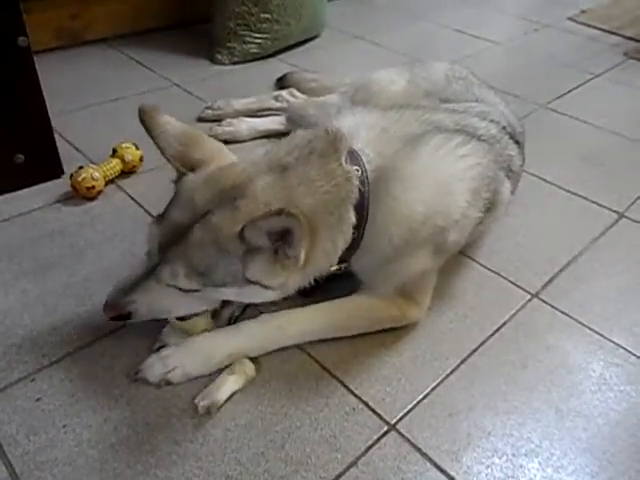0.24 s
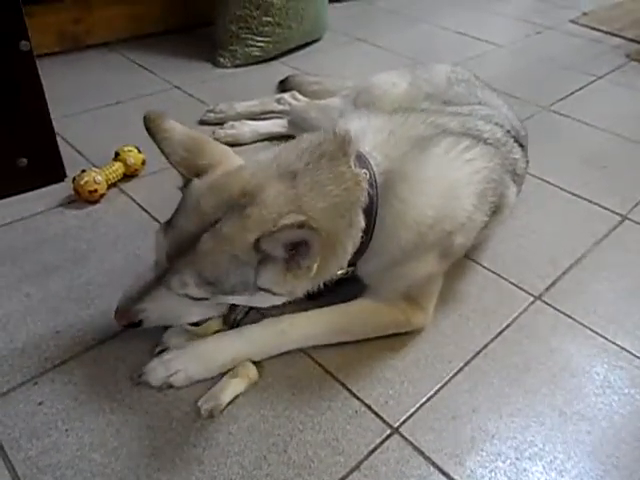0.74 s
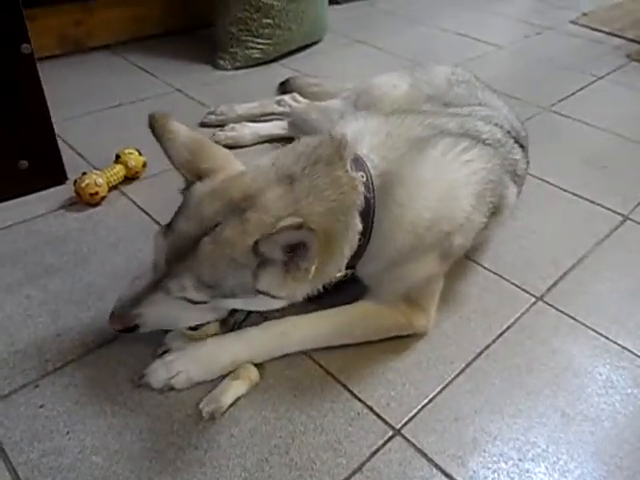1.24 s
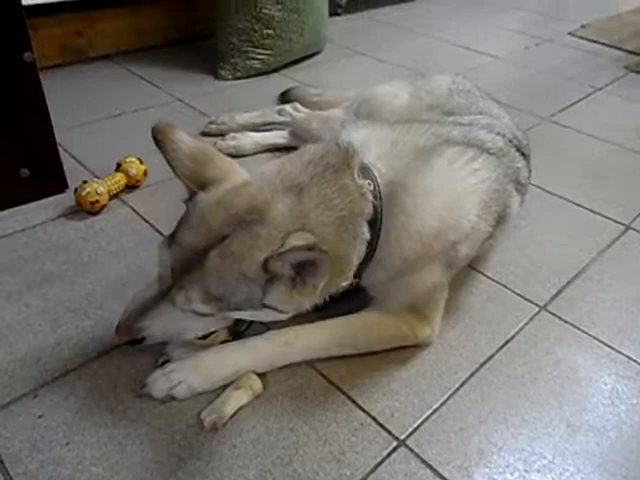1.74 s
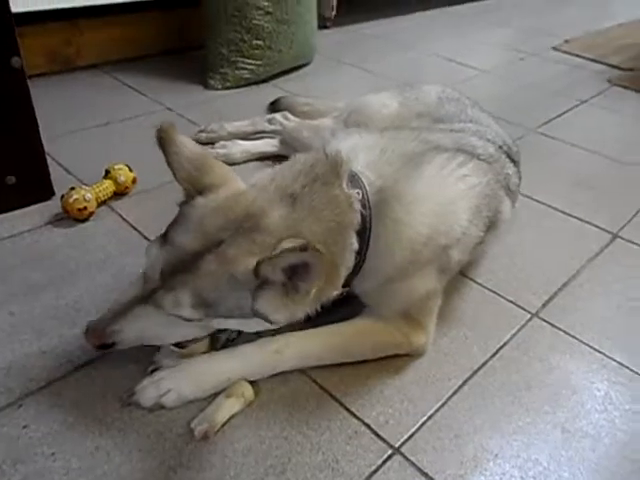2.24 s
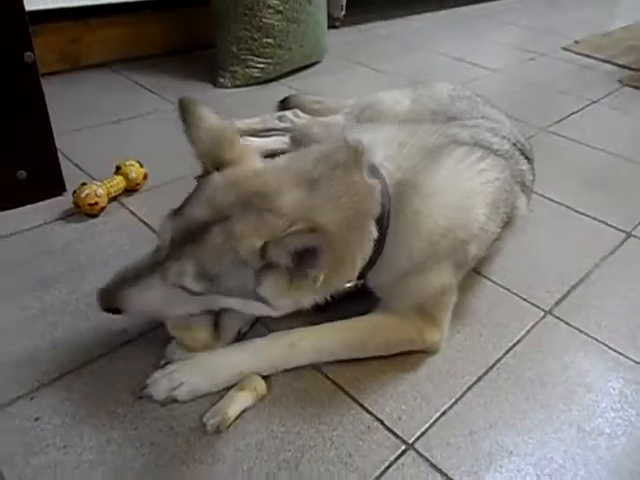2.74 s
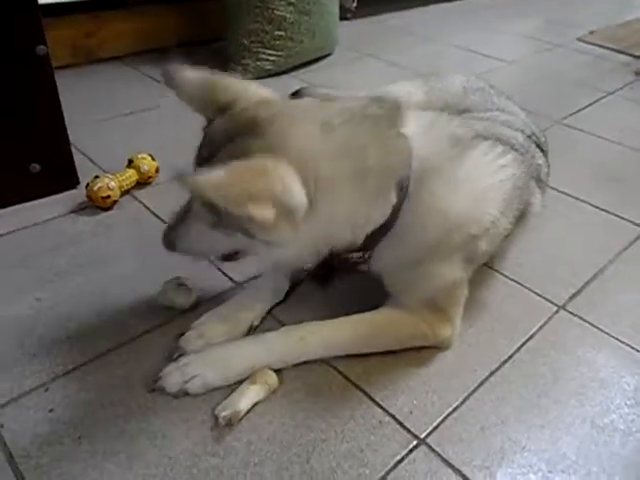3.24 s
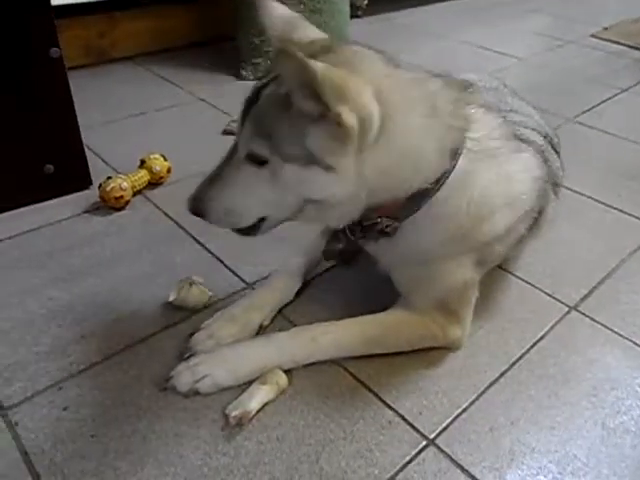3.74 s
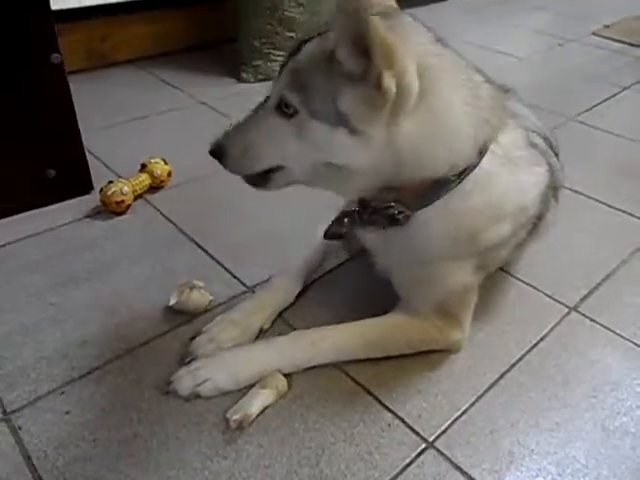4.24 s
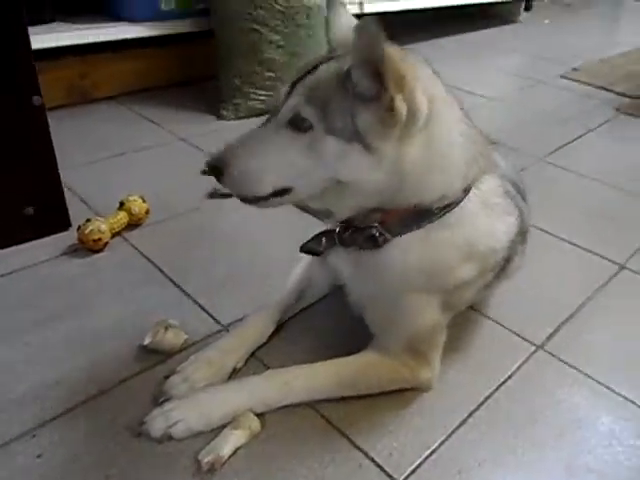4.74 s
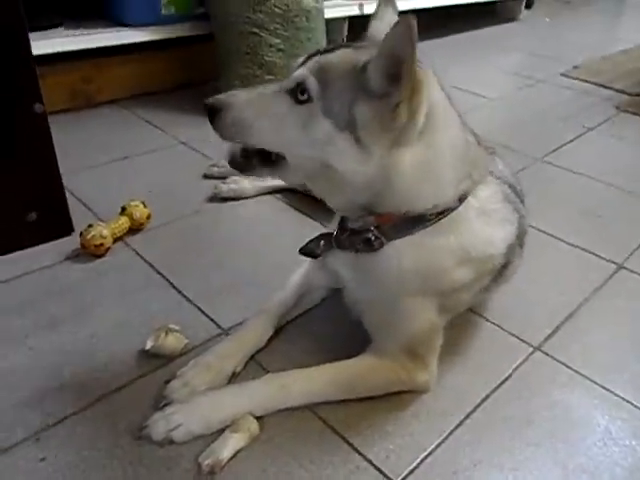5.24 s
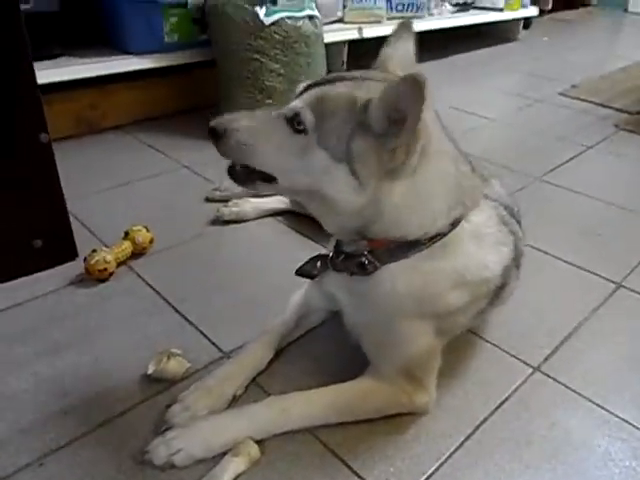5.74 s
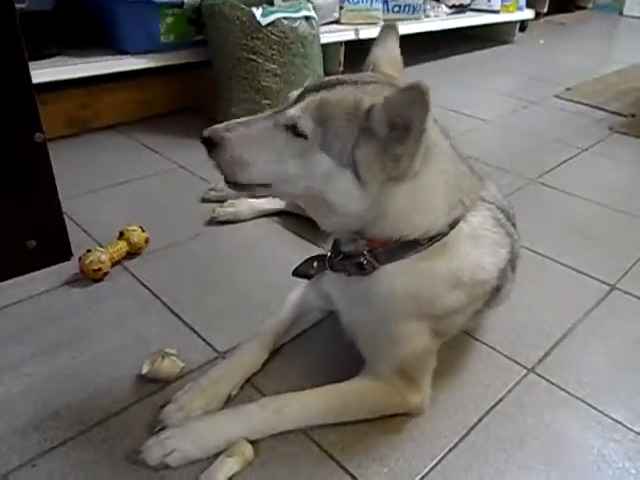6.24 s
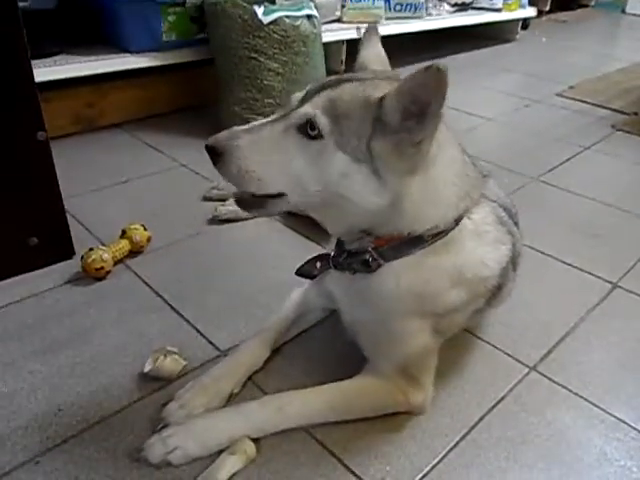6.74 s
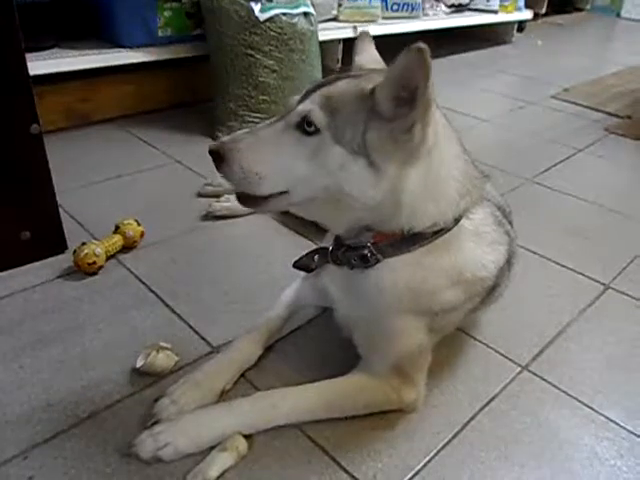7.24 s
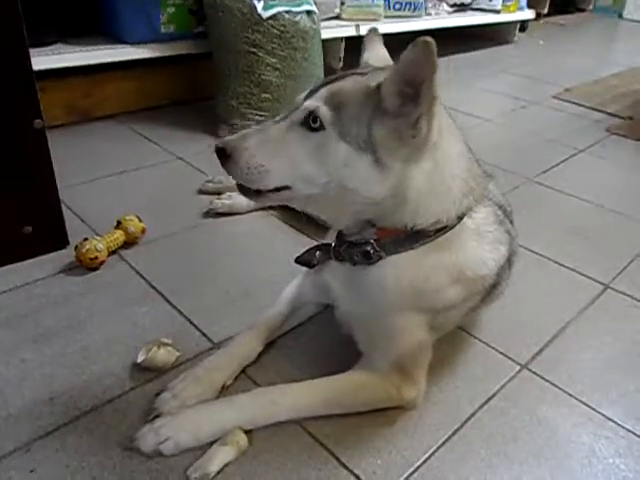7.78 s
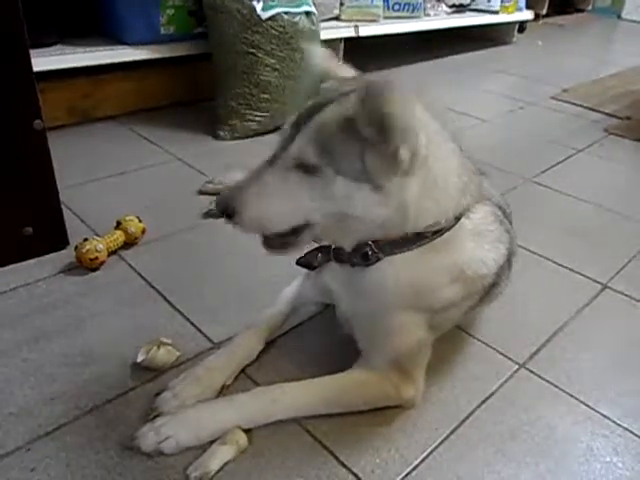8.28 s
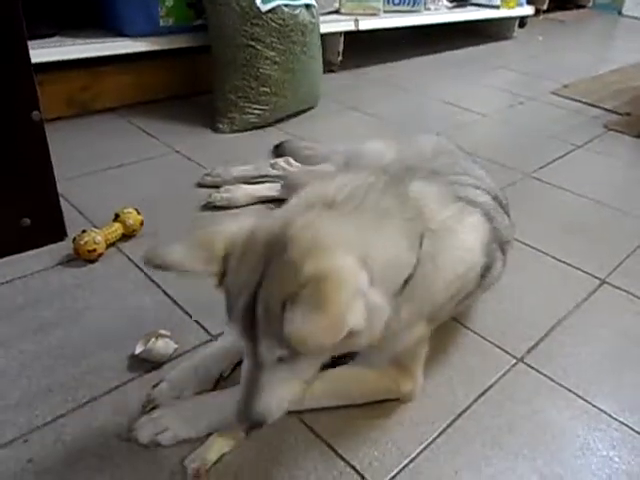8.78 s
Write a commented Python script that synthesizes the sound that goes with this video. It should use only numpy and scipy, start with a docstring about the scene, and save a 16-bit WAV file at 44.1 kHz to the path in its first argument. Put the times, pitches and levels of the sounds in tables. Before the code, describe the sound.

A small parakeet whistles and chatters hoarsely throughout in a tiled room, while a dog crunches a hard chew near the microphone. Brittle snaps with small thuds fill the first third, then give way to soft scraping and tooth ticks. A few brief, harsh squawks or snorts cut in toward the end. Quiet room hiss, a low hum and handling rumble sit behind it all.

```python
"""A room with a tiled floor, heard through the microphone of a hand-held camera.
Close up, a dog gnaws a hard chew: its teeth rub and tick, and each crack knocks through jaw and floor.
Across the room a small parakeet warbles, short whistles amid scratchy chatter. A few harsh, raspy
bursts cut in, bird squawks or dog snorts. Underneath lie room hiss, an appliance's hum and the
camera's handling rumble."""
import sys
import numpy as np
from scipy import signal
from scipy.fft import rfft, irfft, next_fast_len
from scipy.io import wavfile
from scipy.ndimage import map_coordinates

SR = 44100
rng = np.random.default_rng(int(sys.argv[2]) if len(sys.argv) > 2 else 0)


def unload_audio(sound):
    """Save the sound as a 16-bit wav file, at the path given as the first command line argument."""
    columns = np.transpose(np.atleast_2d(sound))
    # keep every value between -1 and 1, then stretch to whole-number steps
    steps = np.round(np.clip(columns, -1, 1) * 32767)
    wavfile.write(sys.argv[1], SR, steps.astype(np.int16))


N = 397341

# the parakeet's phrases: (time [s], length [s], centre pitch [Hz], voice level [dB], rasp level [dB])
PHRASES = [(0.0, 0.26, 1900, -61, -61), (0.358, 0.053, 1500, -56.5, -73), (0.595, 0.15, 2300, -57.5, -74),
           (0.999, 0.28, 2480, -61, -84), (1.394, 0.15, 2550, -56.5, -75),
           (1.901, 0.27, 2060, -58.5, -63.5), (2.26, 0.2, 2580, -52.5, -75), (2.578, 0.28, 2260, -62, -71),
           (2.851, 0.65, 2470, -58, -71.5), (3.649, 0.2, 2260, -58, -66.5),
           (3.944, 0.22, 2330, -59.5, -68.5), (4.229, 0.23, 2290, -55, -68.5),
           (4.472, 0.21, 1840, -60, -63), (4.703, 0.15, 2540, -52, -68.5), (4.997, 0.25, 2450, -56, -56.5),
           (5.318, 0.17, 2140, -57.5, -59), (5.512, 0.22, 2850, -55, -60), (5.951, 0.35, 2380, -61, -62),
           (6.377, 0.32, 2130, -62.5, -59), (6.706, 0.21, 2410, -54, -58.5),
           (6.997, 0.35, 2650, -55, -69.5), (7.353, 0.18, 2450, -55, -71), (7.764, 0.15, 2590, -55.5, -67),
           (7.954, 0.45, 2390, -59, -64.5), (8.56, 0.19, 2790, -50, -66), (8.852, 0.11, 2900, -52, -52.5)]
# how hard the teeth work: (time [s], level [dB])
GNAW_EFFORT = [(0.0, -85), (0.25, -64.5), (0.95, -61), (1.3, -61), (3.26, -62), (4.59, -62), (5.71, -62),
               (5.84, -61.5), (7.09, -60), (7.39, -65), (8.2, -63), (9.0, -66)]


def amp(db):
    return np.exp(np.asarray(db) * (np.log(10) / 20))


def unit(x):
    return x / np.sqrt(np.mean(x ** 2) + 1e-20)


def along(points, hz):
    """Read (frequency, value) points at hz, on a log axis."""
    f, v = np.transpose(points)
    return np.interp(np.log(hz + 1), np.log(f + 1), v)


def level_at(points, t):
    """Read (time, level) points at times t."""
    return np.interp(t, *np.transpose(points))


def wobble(rate):
    """A smooth random curve, rate knots a second."""
    knots = rng.standard_normal(int(N * rate / SR) + 4)
    smooth = map_coordinates(knots, [np.arange(0, N + 8, 8) * rate / SR])
    return np.interp(np.arange(N) / 8, np.arange(len(smooth)), smooth)


def filtered(x, response):
    """Shape x by a frequency response."""
    size = next_fast_len(N + SR // 2)
    return irfft(rfft(x, size) * response(np.fft.rfftfreq(size, 1 / SR)), size)[..., :N]


def noise(response):
    """Coloured noise of rms 1."""
    return unit(filtered(rng.standard_normal(N), response))


def resonance(f, centre, width):
    return 1j * f * width / (centre ** 2 - f * f + 1j * f * width)


def add(track, s, x):
    """Mix x into track from time s."""
    part = track[round(s * SR):][:len(x)]
    part += x[:len(part)]


def background():
    """Drifting room hiss, an appliance's wavering hum and the rumble of the hand-held camera."""
    # room tone: (frequency [Hz], relative density [dB])
    air = [(41, -29), (70, -0.5), (108, -8.5), (190, -10.5), (421, -13.5), (516, -18.5), (813, -10.5),
           (953, -16.5), (2210, -17), (3900, -25), (7880, -23.5), (15900, -34.5)]
    # appliance hum: (frequency [Hz], level [dB], wander [Hz])
    hum_lines = [(100.1, -55, 2.01), (121.9, -65.5, 4), (150, -67.5, 1.99), (436, -72.5, 4),
                 (1118, -70.5, 4), (1369, -71.5, 4)]
    # handling rumble: (time [s], level [dB])
    handling = [(0, -61.5), (2.6, -61.5), (3.3, -54.5), (4.7, -55), (6.5, -59.5), (8.5, -60), (8.75, -43.5),
                (9, -51)]
    hiss = amp(-58 + 0.71 * wobble(6)) * noise(lambda f: amp(along(air, f)) * (f > 60))
    hum = sum(amp(db + 0.5 * wobble(30)) * np.sin(2 * np.pi * np.cumsum(hz + wander * wobble(15)) / SR)
              for hz, db, wander in hum_lines)
    rumble = noise(lambda f: (f / 20) ** 2 / (1 + (f / 20) ** 2) / (1 + (f / 52) ** 6))
    return hiss + hum + amp(level_at(handling, np.arange(N) / SR)) * rumble


def room(x):
    """Tiled walls answer; each frequency dies at its own speed."""
    # reverberation: (frequency [Hz], t60 [s])
    decay = [(300, 0.1), (3000, 0.19), (10000, 0.21)]
    hz, t, spectrum = signal.stft(rng.standard_normal(SR // 2), SR, nperseg=256)
    tail = signal.istft(spectrum * amp(-60 * t / along(decay, hz)[:, None]), SR, nperseg=256)[1]
    return signal.fftconvolve(np.pad(x, (200, 0)), tail / np.linalg.norm(tail))[:N]


def bird_voice(hz):
    """A whistle with two overtones; the windpipe lifts the upper one near 8 kHz."""
    phase = 2 * np.pi * np.cumsum(hz) / SR
    windpipe = 1 / (1 + ((3 * hz - 8300) / 900) ** 2)
    return np.sin(phase) + amp(-19.5) * np.sin(2 * phase) + amp(-6.5) * windpipe * np.sin(3 * phase)


def whistles(clear_db=-70, hoarse_per_db=0.0956):
    """The parakeet's abrupt, gliding notes; the raspier the phrase, the more pitch and level shake."""
    # whistled notes: (time [s], length [s], first pitch [Hz], last pitch [Hz], level [dB])
    notes = [(0.104, 0.06, 1284, 1613, -51), (1.008, 0.028, 2640, 2740, -52.5),
             (1.044, 0.025, 2154, 2520, -44.5), (1.121, 0.039, 2900, 3085, -53),
             (1.188, 0.058, 2150, 2100, -54.5), (1.19, 0.062, 1045, 1047, -54),
             (1.536, 0.037, 2600, 2554, -48), (2.264, 0.022, 1980, 1920, -51.5),
             (2.353, 0.028, 2274, 2320, -47), (2.425, 0.037, 2520, 2540, -46.5),
             (2.581, 0.038, 1990, 2780, -48), (2.629, 0.024, 1530, 1525, -47.5),
             (2.655, 0.037, 2400, 2410, -47.5), (2.718, 0.09, 2700, 1252, -54),
             (2.804, 0.028, 2440, 2533, -49.5), (2.851, 0.035, 4050, 3300, -49),
             (2.897, 0.074, 3110, 2710, -51), (2.959, 0.025, 2180, 2290, -52),
             (3.089, 0.033, 2770, 2763, -52), (3.223, 0.03, 2855, 2807, -52.5),
             (3.293, 0.037, 2378, 2370, -46.5), (3.356, 0.038, 2834, 2730, -52.5),
             (3.44, 0.053, 1440, 1570, -52), (3.546, 0.034, 1480, 1520, -48),
             (3.664, 0.043, 2730, 2935, -50), (3.698, 0.015, 3310, 3300, -45),
             (3.738, 0.032, 2635, 2614, -50), (4.032, 0.053, 3300, 2470, -54.5),
             (4.299, 0.068, 2260, 2360, -49), (4.374, 0.04, 2520, 2530, -45),
             (4.586, 0.025, 1342, 1530, -51.5), (4.714, 0.037, 2320, 2760, -52),
             (4.772, 0.03, 2750, 2800, -48), (4.798, 0.0296, 2790, 2900, -43.5),
             (5.062, 0.027, 2650, 2704, -44), (5.567, 0.035, 3910, 3825, -47.5),
             (5.596, 0.071, 2417, 2340, -47.5), (5.627, 0.067, 2796, 2726, -46),
             (5.652, 0.016, 3800, 3955, -40), (6.09, 0.046, 2870, 2767, -50.5),
             (6.16, 0.018, 2310, 2180, -47), (6.214, 0.038, 2523, 2460, -48),
             (6.423, 0.046, 2010, 2120, -52), (6.487, 0.041, 2560, 2530, -52.5),
             (6.56, 0.07, 1900, 1237, -52), (6.721, 0.029, 3014, 3020, -51.5),
             (6.994, 0.047, 2350, 2886, -53), (7.108, 0.06, 2982, 2727, -48.5),
             (7.391, 0.055, 2790, 2810, -51.5), (7.44, 0.051, 2667, 2520, -46.5),
             (7.54, 0.054, 3310, 3010, -48), (7.782, 0.054, 3200, 2876, -47.5),
             (7.851, 0.037, 2780, 2606, -47), (8.176, 0.064, 2627, 2210, -48),
             (8.246, 0.049, 2663, 2496, -44.5), (8.305, 0.05, 2060, 1858, -50),
             (8.554, 0.037, 2370, 2590, -49), (8.618, 0.032, 2760, 2755, -48.5),
             (8.654, 0.026, 3200, 3340, -42), (8.724, 0.018, 4240, 4326, -43),
             (8.679, 0.021, 1503, 1530, -45.5), (8.854, 0.021, 2027, 1870, -48),
             (8.855, 0.04, 3950, 3900, -53.5), (8.888, 0.025, 2650, 2530, -48),
             (8.884, 0.078, 2050, 1408, -50.5), (8.965, 0.045, 2098, 2060, -56.5)]
    out = np.zeros(N)
    waver, flutter = np.tile([wobble(400), wobble(300)], 2)
    starts, *_, rasp_db = np.transpose(PHRASES)
    for s, length, first_hz, last_hz, db in notes:
        t = np.arange(round(length * SR)) / SR
        here = slice(round(s * SR), round(s * SR) + len(t))
        nearest = np.abs(starts - s).argmin()
        hoarse = 1 + hoarse_per_db * max(rasp_db[nearest] - clear_db, 0)
        hz = (first_hz + (last_hz - first_hz) * t / length) * (1 + 0.0156 * hoarse * waver[here])
        shape = np.clip(t / 0.0017, 0, 1) * np.clip((length - t) / 0.0041, 0, 1)
        shake_db = 2.8 * hoarse * flutter[here].clip(-3, 1)
        add(out, s, amp(db + shake_db) * shape * bird_voice(hz))
    return out


def chatter(phrase_sag=0.15):
    """The parakeet hops between short, hoarse notes round each phrase's sinking pitch, over a rasp."""
    voice_level, rasp_level, centre_hz = np.zeros((3, N))
    for s, length, hz, db, rasp_db in PHRASES:
        t = np.arange(round(length * SR)) / SR
        shape = np.clip(t / 0.017, .25, 1) * np.clip((length - t) / 0.025, 0, 1)
        add(voice_level, s, amp(db) * shape)
        add(rasp_level, s, amp(rasp_db) * np.clip(np.minimum(t / .003, (length - t) / 0.048), 0, 1))
        add(centre_hz, s, hz * (1 + phrase_sag * (.5 - t / length)))
    throat = lambda f: ((f / 900) ** 2 / (1 + (f / 900) ** 2) / (1 + (f / 3600) ** 6)
                        + 0.2 / (1 + ((f - 8200) / 1000) ** 2))
    roughness = amp(2 * wobble(40) + 4.5 * wobble(250) + .5)
    out = rasp_level * roughness * noise(throat)
    for strand in range(3):
        count = np.cumsum(45 * np.exp(.4 * wobble(20))) / SR  # about 45 notes a second
        note, progress = count.astype(int), count % 1
        jump, accent = rng.standard_normal((2, N // 100))[:, note].clip(-2, 1.2)
        hz = centre_hz * np.exp(0.22 * jump - .05 * progress + .05 * wobble(500))
        stutter = amp(2.55 * accent + 4.8 * wobble(400).clip(-3, 1.7)) * np.sin(np.pi * progress ** .5)
        out += voice_level * stutter * bird_voice(hz)
    return out


def raspy_bursts():
    """Harsh, raspy noise bursts (bird squawks or dog snorts) that swell, hold and die away."""
    # bursts: (time of full strength [s], rise [s], hold [s], t60 [s], level [dB])
    bursts = [(0.814, .015, .04, 0.15, -55), (1.264, .01, 0.024, 0.3, -55),
              (5.755, 0.008, 0.0068, 0.1, -58), (6.863, 0.022, 0.035, 0.08, -39.5),
              (7.234, 0.0037, 0.055, 0.05, -49.5), (7.604, 0.012, 0.0082, 0.2252, -33)]
    # their spectrum: (frequency [Hz], relative density [dB])
    colour = [(900, -38), (1750, -21), (2000, -12), (2390, -16.5), (3180, -9), (4880, -9.5), (5570, -1.5),
              (7500, -10.5), (9290, -11.5), (15500, -35)]
    t = np.arange(N) / SR
    rough_noise = rng.standard_normal(N) * amp(1.3 * wobble(300))
    rasp = unit(filtered(rough_noise, lambda f: amp(along(colour, f))))
    shape = np.zeros(N)
    for s, rise, hold, t60, db in bursts:
        swell = np.exp(-((t - s) / rise) ** 2)
        fade = amp(-60 * (t - s - hold).clip(0) / t60)
        shape += amp(db) * np.where(t < s, swell, fade)
    return rasp * shape


def scraping():
    """Fine, patchy rubbing of teeth and tongue on the chew."""
    patches = lambda: amp(3.5 * wobble(8) + 5.5 * wobble(120))
    band = lambda hz, width: noise(lambda f: 1 / (1 + ((f - hz) / width) ** 4)) * patches()
    effort = amp(level_at(GNAW_EFFORT, np.arange(N) / SR))
    return effort * (amp(-6) * band(4740, 1150) + amp(-12) * band(9880, 1850))


def clicks():
    """Thin, bright clicks: puffs of treble noise, each with a fainter tail."""
    # clicks: (time [s], level before the treble tilt [dB])
    puffs = [(0.1276, -54), (0.9383, -48), (1.044, -54), (2.0266, -55), (2.1719, -47), (4.349, -53),
             (4.4363, -48), (4.5423, -59), (5.9953, -53), (6.095, -49)]
    out, t = np.zeros(N), np.arange(SR // 20) / SR
    shape = amp(-60 * t / 0.023) + 0.4 * amp(-60 * t / .08)
    for s, db in puffs:
        add(out, s, amp(db) * shape * rng.standard_normal(len(t)))
    return filtered(out, lambda f: (f / 12500) ** 2)


def tooth_modes(s, hz, db, t60=0.012):
    """Struck teeth ring as damped sines, starting at times s."""
    t = np.arange(SR // 50) / SR
    attack = 1 - np.exp(-t / 0.00011)
    ring = amp(db[:, None] - 60 * t / t60) * attack * np.sin(2 * np.pi * hz[:, None] * t)
    where = (s * SR).astype(int)[:, None] + np.arange(len(t))
    return np.bincount(where.ravel(), ring.ravel(), N + SR)[:N]


def ticks(faint_count=450):
    """Each tick rings four close tooth modes; faint ones fall at random, louder with harder gnawing."""
    # clear ticks of tooth on chew: (time [s], level per mode [dB], pitch [Hz])
    clear = [(0.797, -43, 3970), (0.838, -38.5, 4150), (0.9396, -46.5, 8700), (1.1284, -45.5, 9300),
             (2.167, -43.5, 4670), (2.4523, -38.5, 5710), (3.7194, -41.5, 6060), (3.9432, -47.5, 5320),
             (4.15, -48, 5220), (4.1736, -45, 5760), (4.9182, -44.5, 5380), (5.7478, -47, 4860),
             (5.9918, -46, 6580), (7.0822, -46, 4730), (8.0577, -43.5, 4920), (8.378, -44.5, 7800)]
    strength, pitch = rng.standard_normal((faint_count, 2)).T
    faint_s = rng.uniform(0, N / SR, faint_count)
    faint_db = level_at(GNAW_EFFORT, faint_s) + 6.5 + 3 * strength.clip(-2, 1.5)
    faint_hz = np.clip(5800 * np.exp(.25 * pitch), 3000, 10000)
    faint = np.c_[faint_s, faint_db, faint_hz]
    s, db, hz = np.repeat(np.r_[clear, faint], 4, axis=0).T
    lag, detune = rng.standard_normal((len(s), 2)).T
    return tooth_modes(s + 0.0015 * abs(lag), hz * np.exp(0.07 * detune), db)


def cracks():
    """The chew cracks near the microphone: a snap, a dull thud and a knock through jaw and floor."""
    # breaks and knocks: (time [s], snap level [dB], knock level [dB], knock pitch [Hz])
    breaks = [(0.4593, -31.5, -36.5, 777), (0.796, -41, -49, 151), (0.817, -36, -40.5, 725),
              (0.836, -40, -47, 1100), (1.1435, -43, -39, 333), (1.7971, -37.5, -33.5, 642),
              (2.1335, -33.5, -34.5, 801), (2.4125, -63, -44.5, 155), (2.5983, -21.5, -24, 745),
              (3.1492, -50, -46.5, 725), (3.65, -53, -41.5, 170), (7.3299, -45, -43.5, 1028),
              (8.0391, -61, -45, 848), (8.9434, -66, -39, 795)]
    # after-ring of a knock: (pitch [ratio], relative level [dB], t60 [s])
    jaw_modes = [(0.4, -7.5, 0.029), (.62, -10, 0.021), (1.05, 0, 0.027)]
    snaps, thuds, knocks = np.zeros((3, N))
    t = np.arange(SR // 10) / SR
    attack = 1 - np.exp(-t / 0.0014)
    snap_decay = amp(-60 * t / 0.025) + 0.17 * amp(-60 * t / 0.089)
    for s, snap_db, knock_db, hz in breaks:
        add(snaps, s, amp(snap_db) * rng.standard_normal(len(t)) * attack * snap_decay)
        add(thuds, s, amp(knock_db + 10.5 - 60 * t / 0.049) * rng.standard_normal(len(t)) * attack)
        phase = 2 * np.pi * hz * t
        knock = amp(-60 * t / 0.023) * np.sin(phase)
        ring = sum(amp(db - 60 * t / t60) * np.sin(ratio * phase) for ratio, db, t60 in jaw_modes)
        add(knocks, s, amp(knock_db) * attack * (knock + ring))
    brittle = lambda f: (resonance(f, 4200, 2300) + resonance(f, 8500, 5900)) / (1 + (f / 10800) ** 12)
    return filtered(snaps, brittle) + filtered(thuds, lambda f: resonance(f, 420, 340)) - knocks


def scene():
    """Gnawing and raspy bursts in front, the parakeet across the room, reflections and background."""
    front = cracks() + ticks() + clicks() + scraping() + raspy_bursts()
    bird = whistles() + chatter()
    return (front + bird + room(amp(-6) * front + amp(-5) * bird) + background())[None]


def record(dry):
    """The camera keeps nothing above 15.8 kHz."""
    return filtered(dry, lambda f: f < 15800)


dry = scene()
out = record(dry)
unload_audio(out)
```